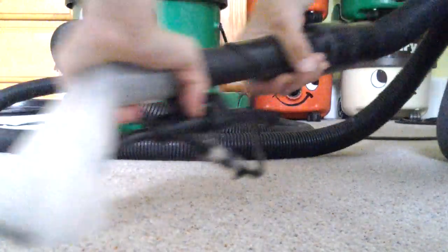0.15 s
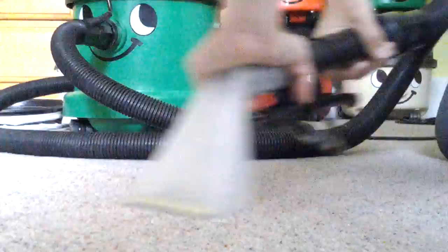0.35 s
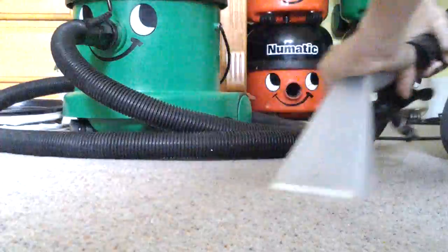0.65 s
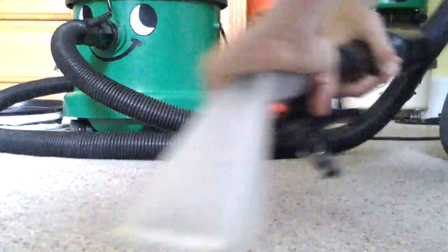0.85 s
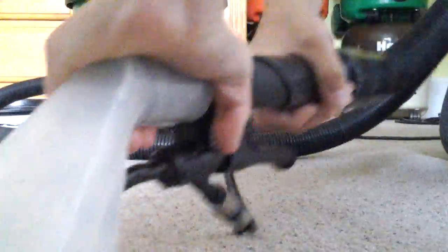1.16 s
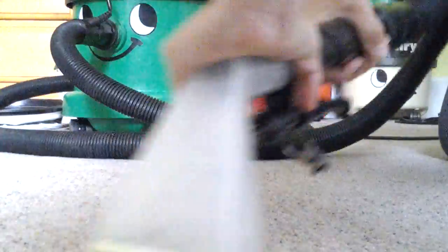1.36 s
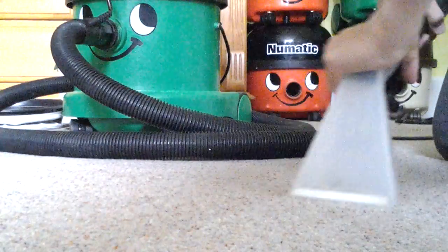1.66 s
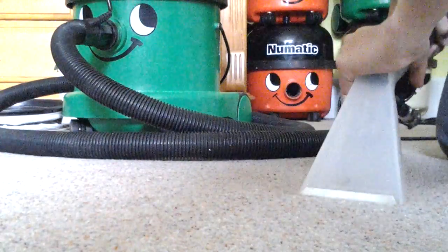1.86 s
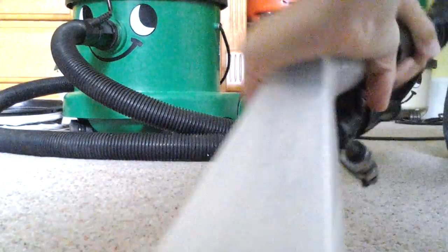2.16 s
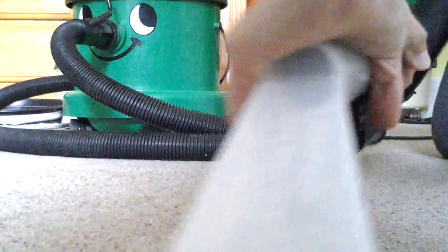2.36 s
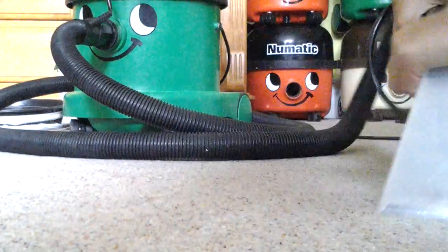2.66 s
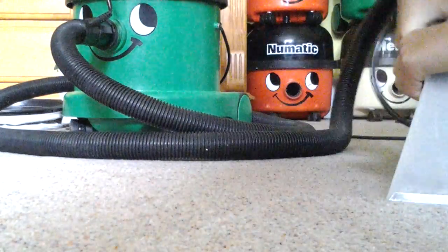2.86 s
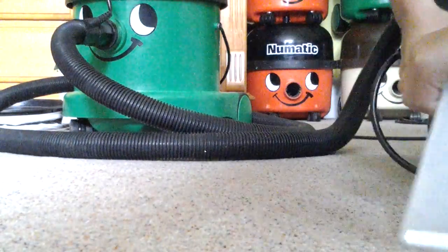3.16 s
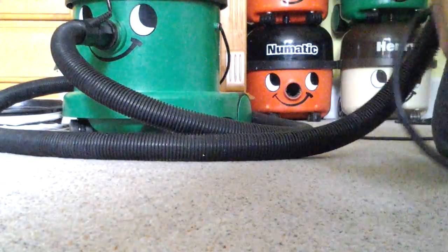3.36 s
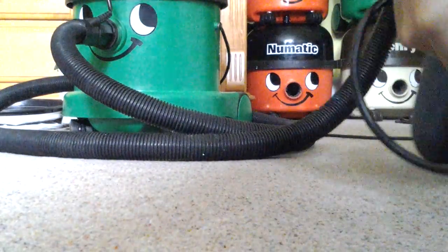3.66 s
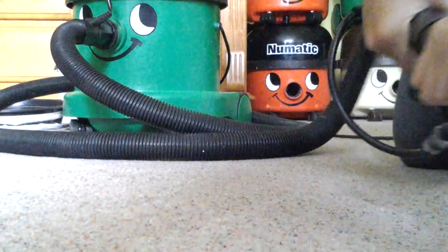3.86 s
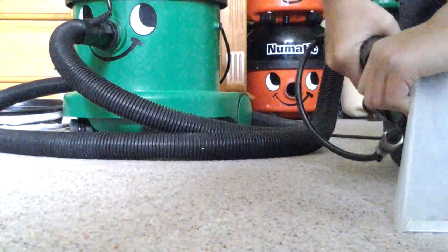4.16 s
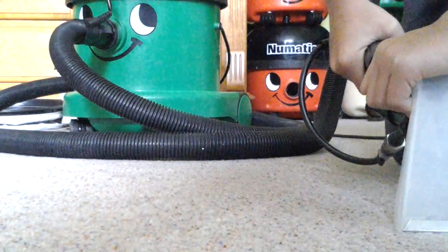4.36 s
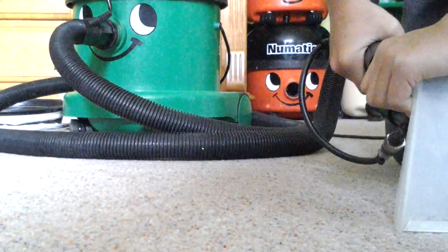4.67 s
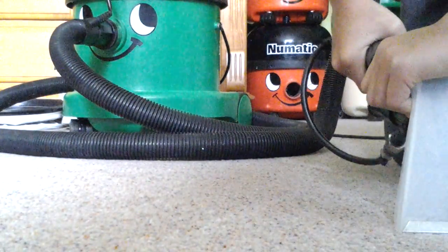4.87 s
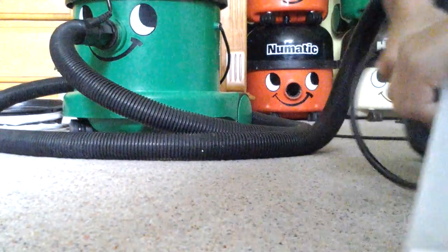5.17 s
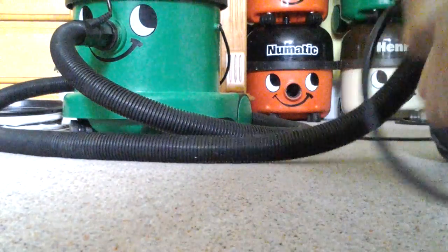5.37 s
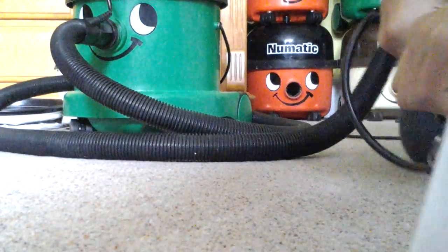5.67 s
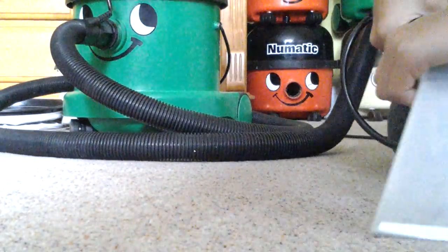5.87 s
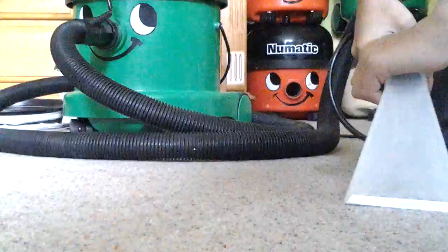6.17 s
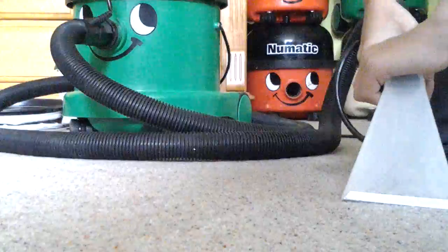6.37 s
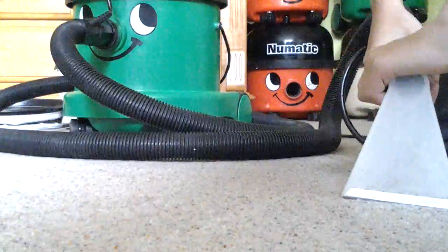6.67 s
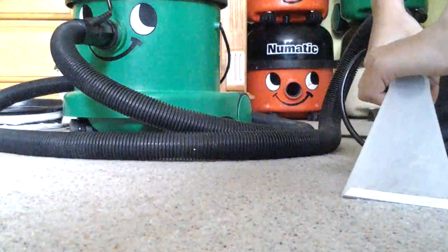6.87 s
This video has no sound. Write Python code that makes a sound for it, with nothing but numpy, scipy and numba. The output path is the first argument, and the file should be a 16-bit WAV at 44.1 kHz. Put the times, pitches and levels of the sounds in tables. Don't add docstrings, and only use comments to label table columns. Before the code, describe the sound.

A canister vacuum is already running at full speed about a metre from a small microphone in a carpeted room, and it continues throughout the seven seconds. Its dense, resonant air roar and bright exhaust hiss surround a steady hum near 420 hertz and a fluttering whine near 5 kilohertz, whose pitch wanders slightly. A soft rush opens the sound. Low, hollow nozzle rubs come at 0.2, 0.5 and 0.75 seconds, the last with a low rising bump. A loud, short air gulp lands at 1.26 with another stroke, then a low thump at 1.5. Strokes follow at 2.0 and 2.5, a higher knock at 2.7, and rubs at 3.1 and 3.8. Friction then mostly fades beneath the motor. A firmer stroke and faint gulp come around 5.2, then weak rubbing; the whine surges at 6.65, and a brief rub begins right at the end.

```python
import sys
import numpy as np
from scipy import signal
from scipy.fft import rfft, irfft, dct
from scipy.io import wavfile
from scipy.ndimage import uniform_filter1d
from numba import njit

SR = 44100
rng = np.random.default_rng(int(sys.argv[2]) if len(sys.argv) > 2 else 0)


def generate_wav(signal):
    frames = np.transpose(np.atleast_2d(signal))
    scaled = np.clip(frames, -1, 1) * 32767
    pcm = np.round(scaled).astype(np.int16)
    wavfile.write(sys.argv[1], SR, pcm)


def convert_level_to_amplitude(level_db):
    exponent = np.asarray(level_db, float) / 20
    return 10 ** exponent


N = 309141
T = np.arange(N) / SR
REST_HZ = 418


def level(x, db=0):
    return x * convert_level_to_amplitude(db) / np.sqrt(np.mean(np.abs(x) ** 2))


def noise(points, modes=()):
    hz = np.fft.rfftfreq(N, 1 / SR) + 1
    point_hz, point_db = np.transpose(points)
    db = np.interp(np.log(hz), np.log(point_hz), point_db, left=-90, right=-90)
    for mode_hz, width, lift_db in modes:
        db = db + lift_db / (1 + (2 * (hz - mode_hz) / width) ** 2)
    return level(irfft(rfft(rng.standard_normal(N)) * convert_level_to_amplitude(db), N))


def walk(rate):
    hold = max(int(SR / rate), 2)
    steps = np.repeat(rng.standard_normal(N // hold + 1), hold)
    return level(uniform_filter1d(uniform_filter1d(steps, hold), hold)[:N])


def bump_shape(centre_s, length_s):
    return np.exp(-.5 * ((T - centre_s) / length_s) ** 2)


@njit
def svf(x, hz, width):
    y, b, l = np.empty(len(x)), 0., 0.
    for i in range(len(x)):
        g, k = np.tan(np.pi * hz[i] / SR), width / hz[i]
        v = (b + g * (x[i] - l)) / (1 + g * (g + k))
        b, l, y[i] = 2 * v - b, l + 2 * g * v, k * v
    return y


# time in seconds, shaft rate in Hz.
SHAFT = [(0.0, 422.5), (0.2, 417), (0.72, 416.1), (1.19, 419.7), (1.44, 413.5), (1.97, 416.4), (2.07, 420),
         (2.4, 419.4), (2.69, 415.8), (3.01, 417.4), (3.26, 422), (3.58, 420.3), (4.08, 417.5),
         (4.53, 421.5), (5.27, 423.3), (5.99, 416.6), (6.3, 417.9), (6.93, 417)]


def shaft_rate():
    s, hz = np.transpose(SHAFT)
    return np.interp(T, s, hz)


# start in seconds, length in seconds, rubbing level in dB,
# air pocket pitch in Hz.
STROKES = [(0.164, .24, -37.5, 191), (0.458, 0.14, -33, 193), (0.742, .4, -29, 290), (1.266, .33, -33, 170),
           (1.998, .34, -31, 224), (2.46, 0.27, -32, 185), (3.138, .3, -35, 206), (3.799, 0.11, -37.5, 176),
           (3.5, 0.1, -46, 189), (4.2, .3, -48, 189), (5.182, .22, -34, 178.5), (5.505, .46, -44.5, 164),
           (6.101, .6, -46.5, 195), (6.983, .05, -30, 210.4)]
IDLE_RUB_DB, IDLE_POCKET_HZ = -55.5, 223
STROKE_ATTACK_S, STROKE_RELEASE_S, STROKE_SAG_DB_PER_S = 0.033, .07, 12.5
POCKET_START, POCKET_OPEN_S = .55, .06


def strokes():
    over_db, pocket_hz = np.zeros(N), np.full(N, float(IDLE_POCKET_HZ))
    for s, length, db, hz in STROKES:
        rise = (T - s) / STROKE_ATTACK_S
        let_go = (s + length - T) / STROKE_RELEASE_S + 1
        held = np.clip(np.minimum(rise, let_go), 0, 1)
        sagging_db = db - IDLE_RUB_DB - STROKE_SAG_DB_PER_S * (T - s)
        over_db = np.maximum(over_db, held * sagging_db)
        opening = 1 - (1 - POCKET_START) * np.exp(-np.maximum(T - s, 0) / POCKET_OPEN_S)
        pocket_hz = np.where(held > 0, hz * opening, pocket_hz)
    return over_db, pocket_hz


# frequency in Hz, level in dB per Hz.
HISS = [(4500, -0.5), (6500, 2.5), (8000, 1.5), (10000, -1.5), (11150, -6.5), (11900, -7.5), (13000, -8.5),
        (14300, -12.5), (15000, -27)]
HISS_DB, HISS_DB_PER_HZ = -26.5, 0.27


def exhaust_hiss():
    hiss_db = HISS_DB + HISS_DB_PER_HZ * (shaft_rate() - REST_HZ)
    return convert_level_to_amplitude(hiss_db + 0.24 * walk(8)) * noise(HISS)


# frequency in Hz, level in dB per Hz.
ROAR = [(100, -68), (200, -33), (310, -18), (520, -17.5), (670, -9.5), (900, -14), (1500, -17), (2100, -14),
        (3000, -14.5), (4300, -8.5), (5000, -3), (5500, -14.5), (6400, -20)]
# frequency in Hz, width in Hz, lift over the roar
# in dB.
RESONANCES = [(650, 48, -1), (1160, 30, 2.5), (1430, 47, 5), (1747, 38, 3), (2133, 100, 4), (2465, 55, 7),
              (2500, 51, 5), (2897, 26, 3), (3015, 41, -0.5), (3340, 81, 4), (3628, 35, 5.5), (3890, 55, 4),
              (4236, 45, 7), (4340, 55, 5.5), (4510, 25, 0.5), (5000, 42, 2), (4830, 34, 0), (5270, 38, 3.5),
        (5461, 78, 4.5), (6030, 42, 6.5)]
ROAR_DB = -15
SUCTION_DB_PER_RUB_DB, SUCTION_LAG_S, SUCTION_LATE_S = 0.1538, 0.24, 0.078


def air_roar():
    smooth_rub_db = uniform_filter1d(strokes()[0], int(SUCTION_LAG_S * SR))
    suction_db = SUCTION_DB_PER_RUB_DB * np.roll(smooth_rub_db, int(SUCTION_LATE_S * SR))
    roar = noise(ROAR, RESONANCES)
    low = signal.sosfilt(signal.butter(2, 2300, fs=SR, output="sos"), roar)
    roar = roar + low * (convert_level_to_amplitude(suction_db - np.mean(suction_db)) - 1)
    return convert_level_to_amplitude(ROAR_DB + 0.52 * walk(5.3)) * roar


ROOM_T60_S, ROOM_DB = 0.21, -8


def in_room(wind):
    t = np.arange(int(.3 * SR)) / SR
    walls = rng.standard_normal(len(t)) * convert_level_to_amplitude(-60 * t / ROOM_T60_S) * (t > .004)
    walls = walls * convert_level_to_amplitude(ROOM_DB) / np.sqrt(np.sum(walls ** 2))
    wind = np.concatenate([wind[::-1][:len(t)], wind])
    return (wind + signal.fftconvolve(wind, walls)[:len(wind)])[len(t):]


IDLE_WANDER_DB = 4.5


def pile_rub():
    over_db, pocket_hz = strokes()
    rub_db = IDLE_RUB_DB + over_db + IDLE_WANDER_DB * walk(15) * convert_level_to_amplitude(-over_db)
    pile = noise([(60, -40), (110, -19.5), (170, 2.0), (350, 3.5), (700, -21.5)]) * convert_level_to_amplitude(1.8 * walk(30))
    return convert_level_to_amplitude(rub_db) * level(svf(pile, pocket_hz, 34.0) + .45 * pile, -2.0)


# time in seconds, level in dB, length in seconds, centre in Hz.
GULPS = [
    (.06, -27.5, 0.16, 1000),
    (1.26, -16, 0.023, 1620),
    (5.282, -25, 0.044, 1210),
]


def gulps():
    out = np.zeros(N)
    for s, db, length, hz in GULPS:
        rush = rng.standard_normal(N) * convert_level_to_amplitude(1.5 * walk(400))
        for _ in range(2):
            rush = svf(rush, np.full(N, float(hz)), 1.04 * hz)
        out += level(rush, db) * bump_shape(s, length)
    return out


# time
# in seconds, level in dB, pitch in Hz, glide in Hz per second.
NOZZLE_RINGS = [
    (.79, -30.5, 216, 1502),
    (1.495, -28.5, 205, 200),
    (2.69, -30, 680, 0),
]
RING_S = .025


def nozzle_rings():
    out = np.zeros(N)
    for s, db, hz, glide in NOZZLE_RINGS:
        since = T - s
        ring = np.sin(2 * np.pi * (hz + glide * since / 2) * since)
        out += np.sqrt(2) * convert_level_to_amplitude(db) * ring * bump_shape(s, RING_S)
    return out


def blade_tone(phase, db, flutter_db):
    return np.sqrt(2) * convert_level_to_amplitude(db + flutter_db * walk(25)) * np.sin(phase + 0.48 * walk(12))


# time in seconds, lift in dB, half length in seconds.
SURGES = [(.09, 4, .03), (.27, -1, .05), (0.995, -10, 0.023), (1.067, 1, 0.017), (1.14, -14, 0.024),
          (1.478, -4, .05), (1.66, 5, 0.021), (1.91, 6, 0.021), (2.162, -3, .02), (2.353, -8, .12),
          (2.8, 6, 0.12), (3.2, 4, .02), (3.36, 3, .08), (4.14, 8, .025), (4.39, 2, 0.019),
          (4.72, -3, 0.053), (4.935, 3.5, 0.041), (5.253, 7, .025), (5.93, 4, .02), (6.201, 4, .1),
          (6.48, -6, 0.061), (6.66, 12, 0.038), (6.8, 2.5, 0.067)]
BLADES = 12
HUM_DB, HUM_DB_PER_HZ = -18, -0.49
WHINE_DB, WHINE_WANDER_DB = -19, 1.56
SHAFT_WOBBLE_HZ = .15
SKIRT_DB, SKIRT_HZ = -16, 71
OCTAVE_FADE_DB = -0.6


def motor():
    shaft_hz = shaft_rate()
    turn = 2 * np.pi * np.cumsum(shaft_hz + SHAFT_WOBBLE_HZ * walk(7)) / SR
    hum_db = HUM_DB + HUM_DB_PER_HZ * (shaft_hz - REST_HZ) + .5 * walk(3.24)
    hum = np.sqrt(2) * convert_level_to_amplitude(hum_db + 0.77 * walk(17)) * np.sin(turn)

    whine_db = WHINE_DB + WHINE_WANDER_DB * walk(18)
    for s, db, length in SURGES:
        whine_db = whine_db + db * bump_shape(s, length)
    whine = convert_level_to_amplitude(whine_db) * blade_tone(BLADES * turn, -4, 1.24)
    octave = convert_level_to_amplitude(OCTAVE_FADE_DB * walk(1.4)) * blade_tone(2 * BLADES * turn, -39, 2.7)
    half = blade_tone(.5 * BLADES * turn, -45, 2.5)
    skirt = svf(rng.standard_normal(N), BLADES * shaft_hz, float(SKIRT_HZ))
    skirt = convert_level_to_amplitude(0.3 * whine_db) * level(skirt, SKIRT_DB)
    return hum + whine + skirt + octave + half


def scene():
    wind = in_room(air_roar() + exhaust_hiss())
    nozzle = pile_rub() + gulps() + nozzle_rings()
    return (wind + nozzle + motor())[None]


# frequency in Hz, step in dB.
CAMERA_STEP = [(60, -23), (240, -22), (330, -32), (7000, -35.5), (8600, -25), (10300, -17), (20000, -14.5)]


def camera_sparkle(x, size=1024):
    offset = 300
    window = signal.windows.kaiser_bessel_derived(2 * size, 2.1 * np.pi)
    padded = np.pad(x, (size + offset, 2 * size - (len(x) + offset) % size))
    blocks = padded.reshape(-1, size)
    a, b, c, d = np.split(np.hstack([blocks[:-1], blocks[1:]]) * window, 4, axis=1)
    lines = dct(np.hstack([-c[:, ::-1] - d, a - b[:, ::-1]]), type=4, norm="ortho")

    hz = (np.arange(size) + .5) * SR / (2 * size)
    step_hz, step_db = np.transpose(CAMERA_STEP)
    breath_db = .8 * uniform_filter1d(rng.standard_normal(len(lines)), size=3)[:, None]
    step = convert_level_to_amplitude(np.interp(np.log(hz), np.log(step_hz), step_db) + breath_db)
    lines = np.sign(lines) * np.floor(np.abs(lines) / step + .4) * step

    u, v = np.split(dct(lines, type=4, norm="ortho"), 2, axis=1)
    frames = np.hstack([v, -v[:, ::-1], -u[:, ::-1], -u]) * window
    return (frames[1:, :size] + frames[:-1, size:]).ravel()[offset:offset + len(x)]


def band_limit(x):
    return signal.sosfilt(signal.butter(12, 14180, fs=SR, output="sos"), x)


def record(dry):
    x = signal.sosfilt(signal.butter(2, 110, "high", fs=SR, output="sos"), dry)
    x = x / (1 + np.abs(x / 1.12) ** 6) ** (1 / 6)
    mix = camera_sparkle(x[0])[None]
    return band_limit(mix)


dry = scene()
out = record(dry)
generate_wav(out)
```